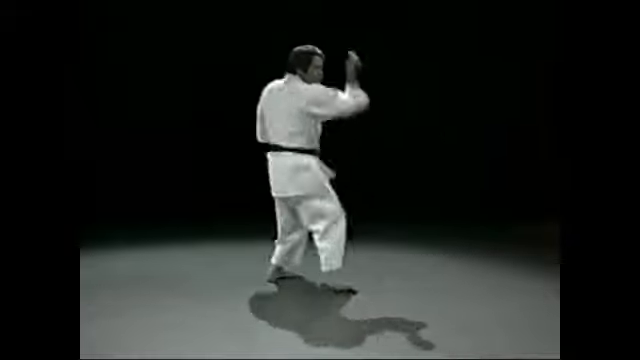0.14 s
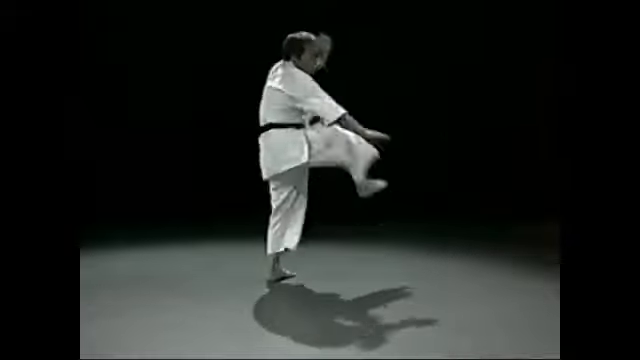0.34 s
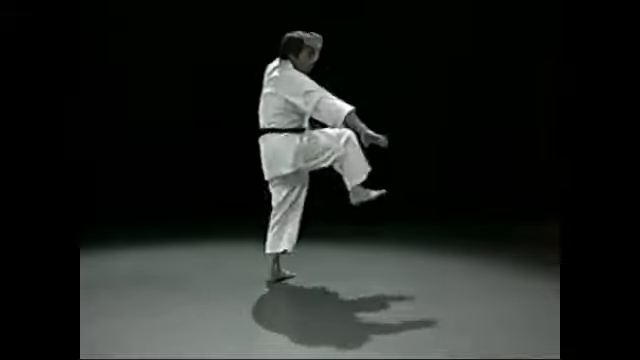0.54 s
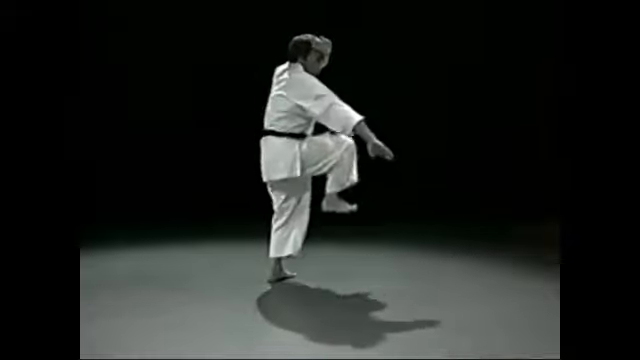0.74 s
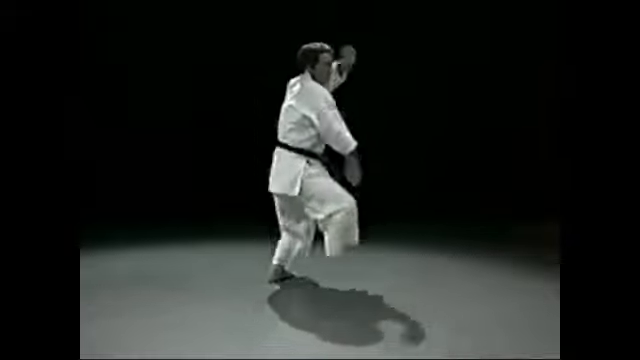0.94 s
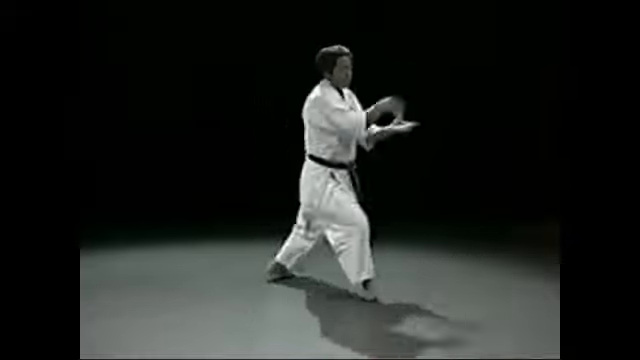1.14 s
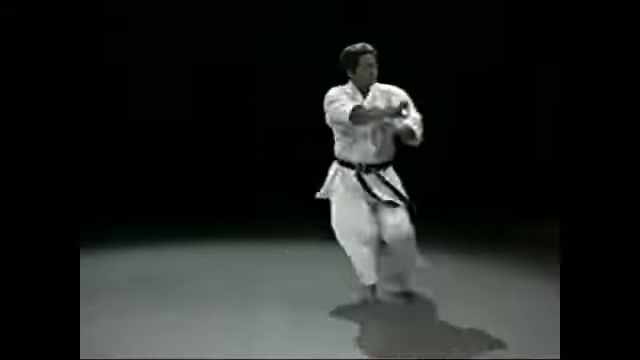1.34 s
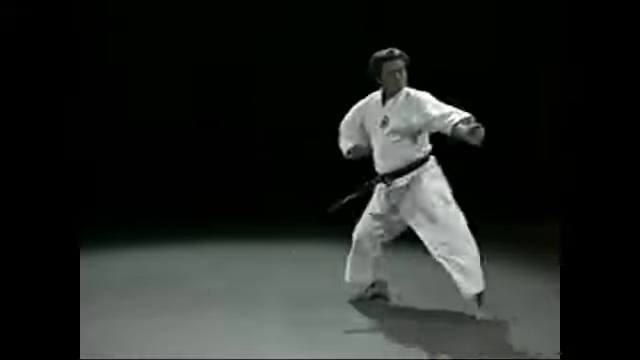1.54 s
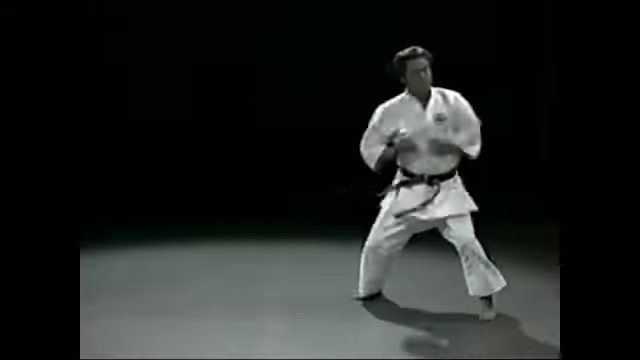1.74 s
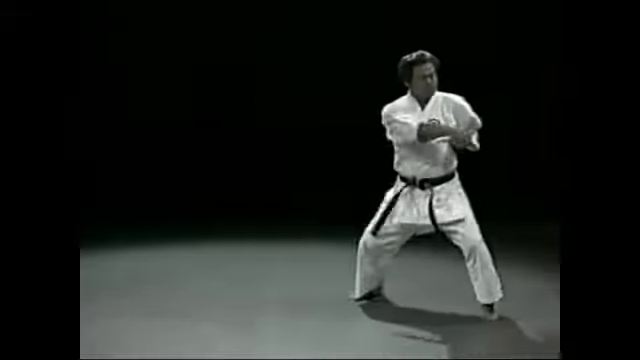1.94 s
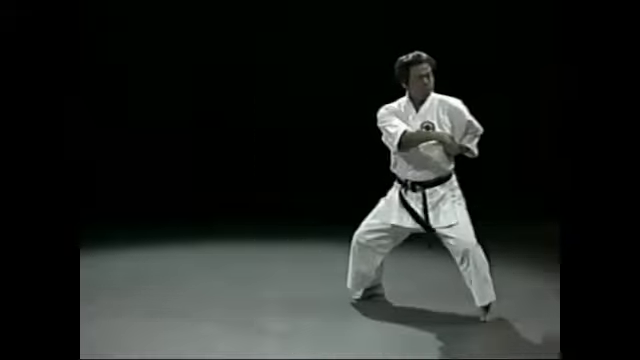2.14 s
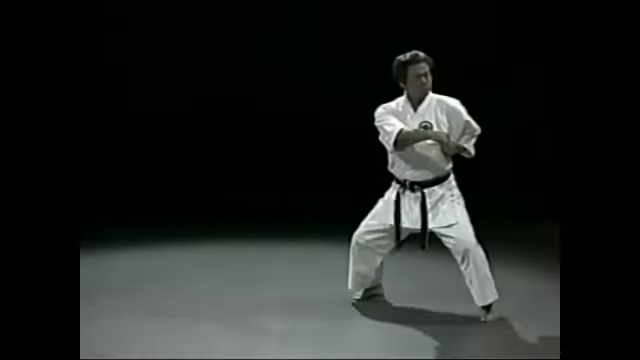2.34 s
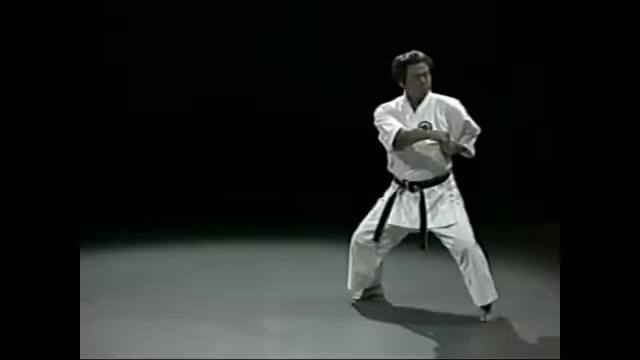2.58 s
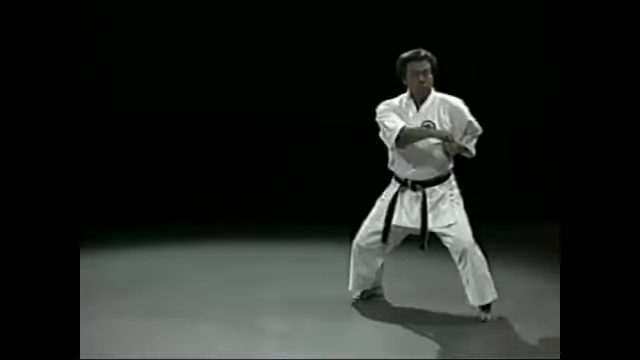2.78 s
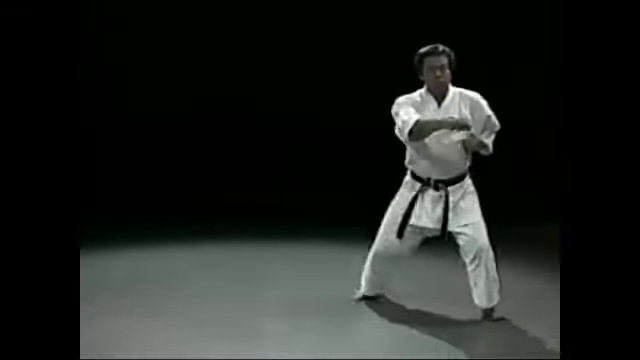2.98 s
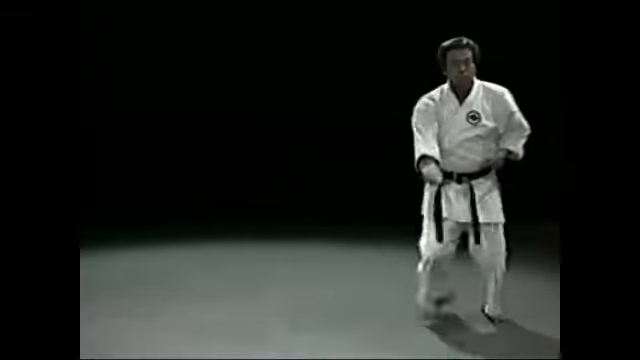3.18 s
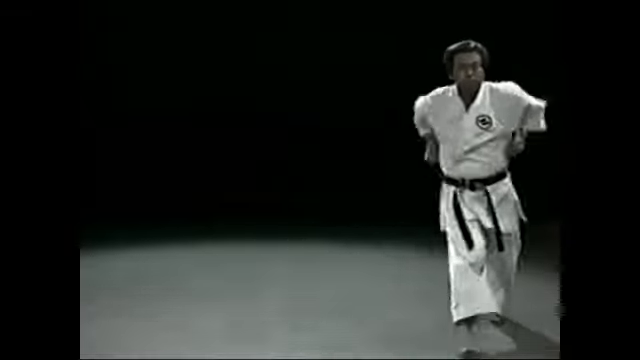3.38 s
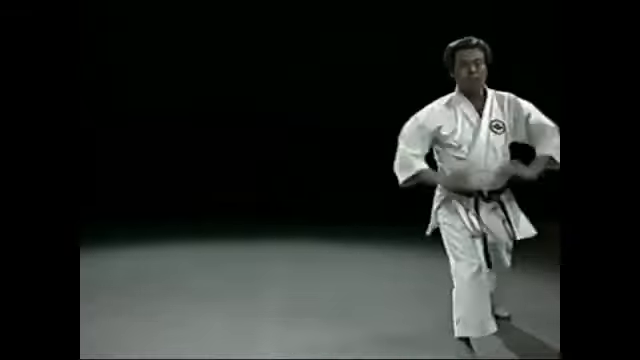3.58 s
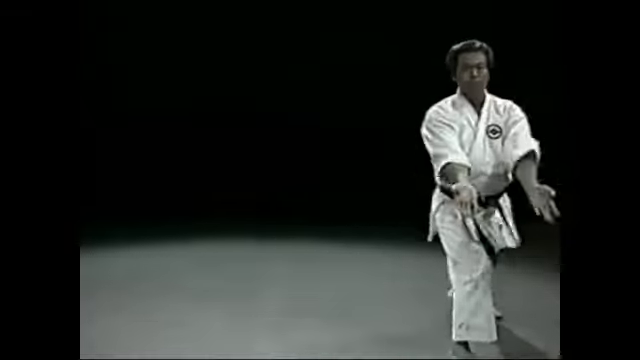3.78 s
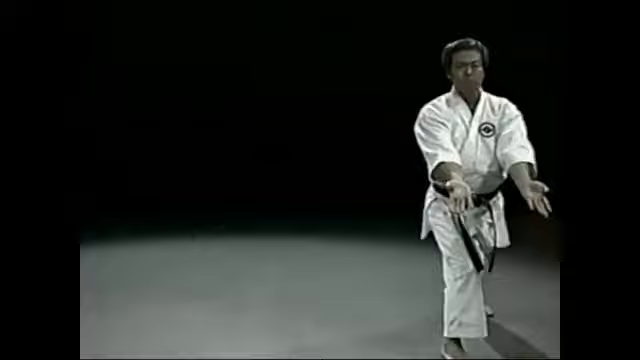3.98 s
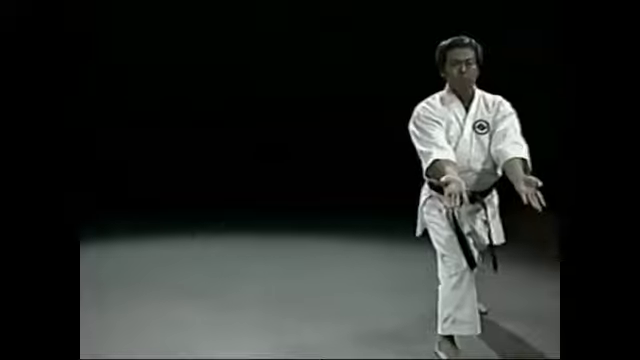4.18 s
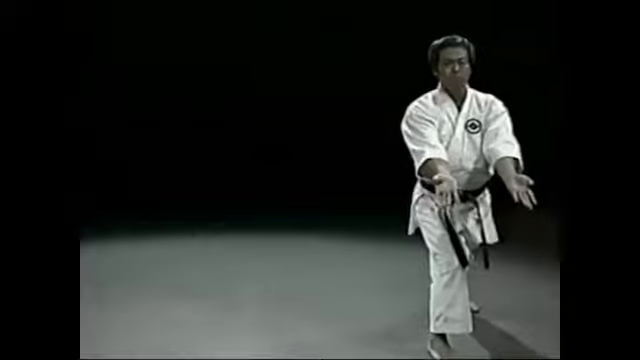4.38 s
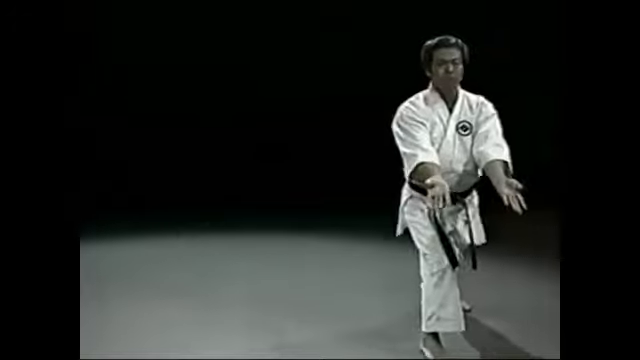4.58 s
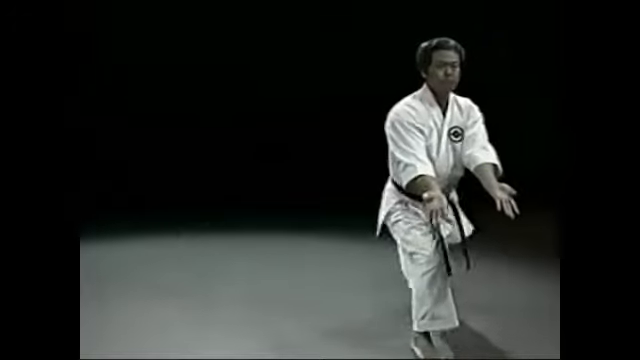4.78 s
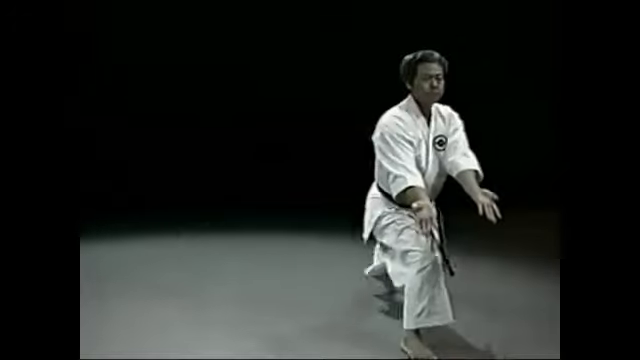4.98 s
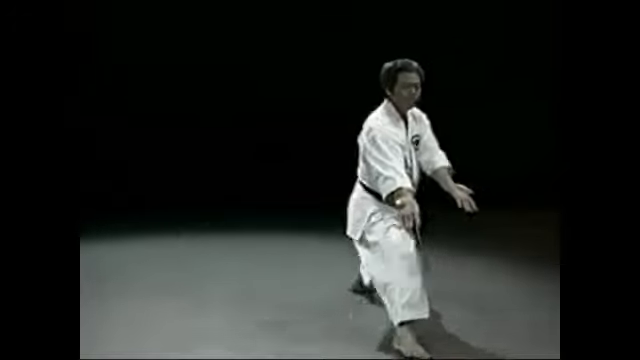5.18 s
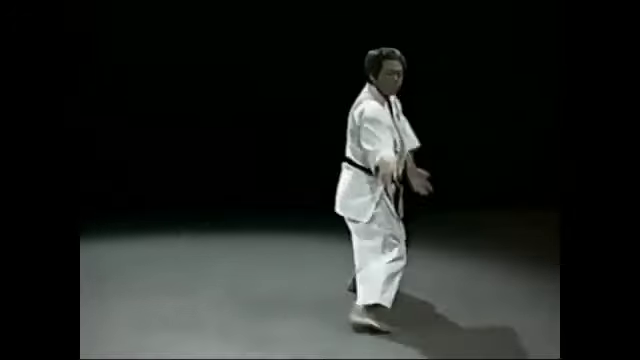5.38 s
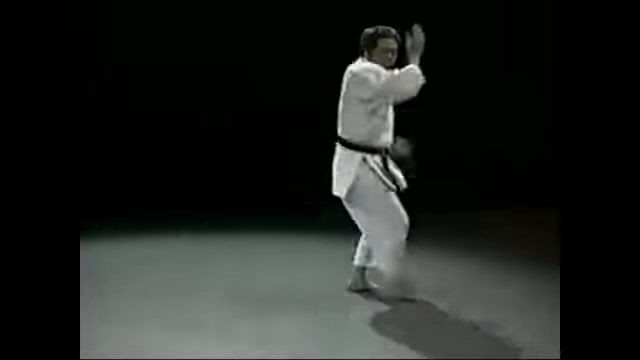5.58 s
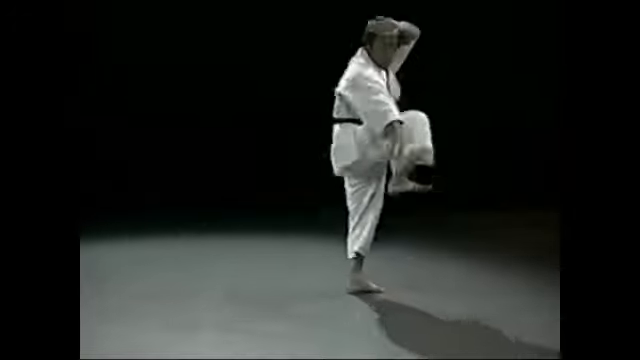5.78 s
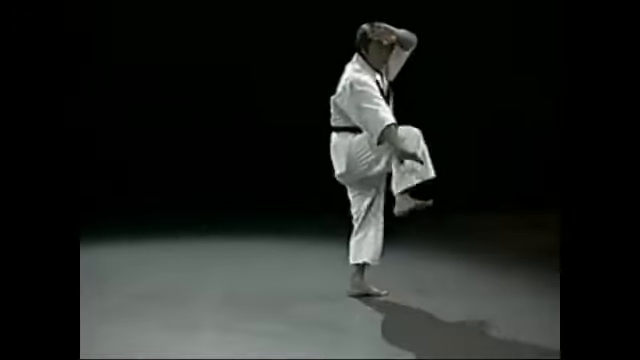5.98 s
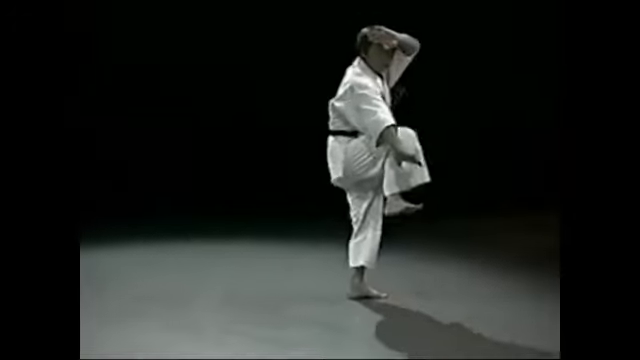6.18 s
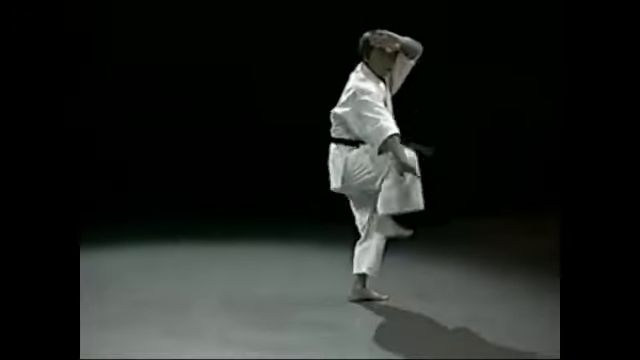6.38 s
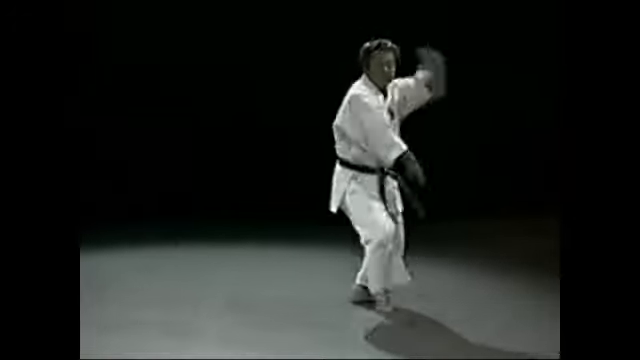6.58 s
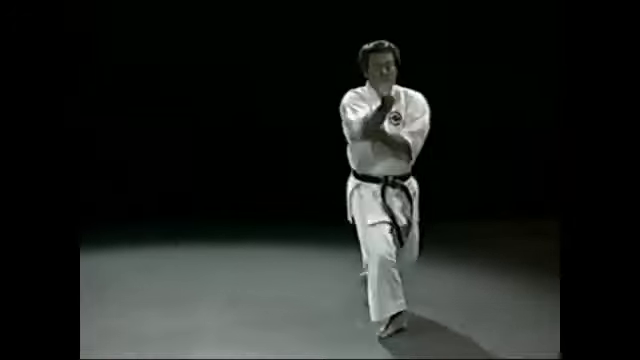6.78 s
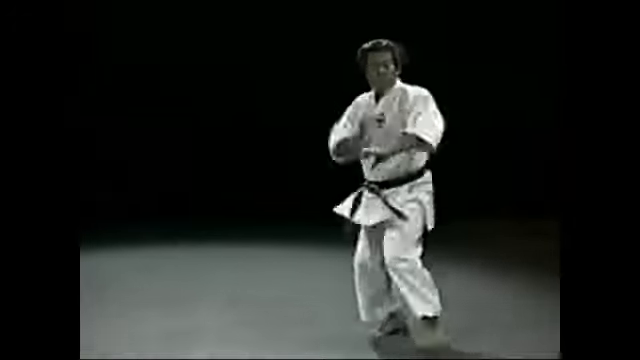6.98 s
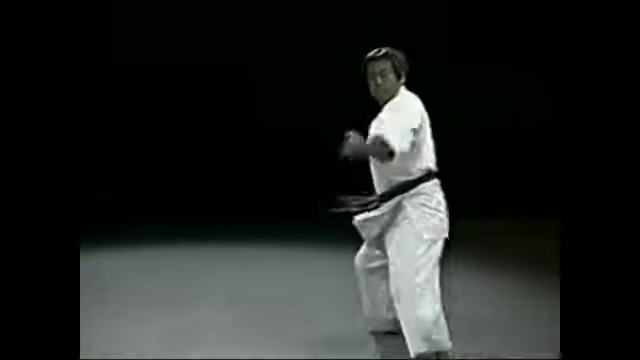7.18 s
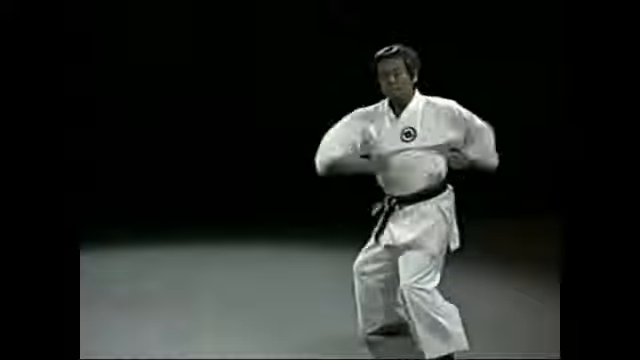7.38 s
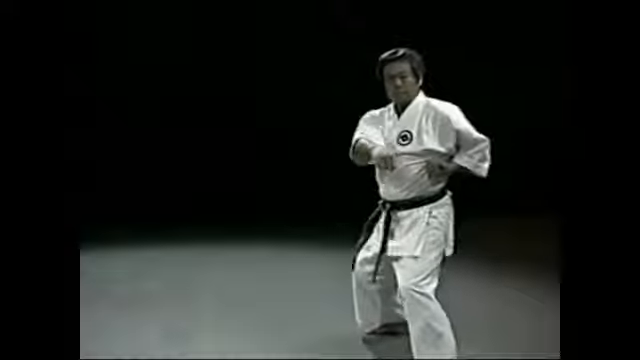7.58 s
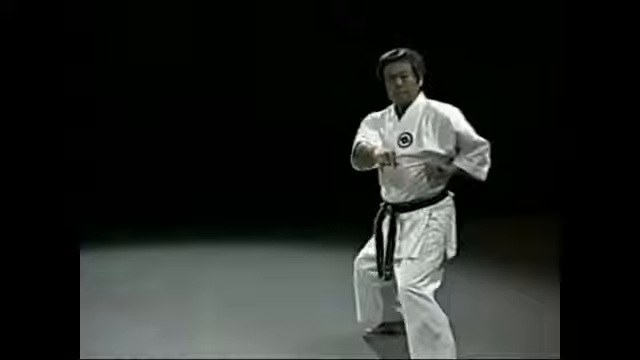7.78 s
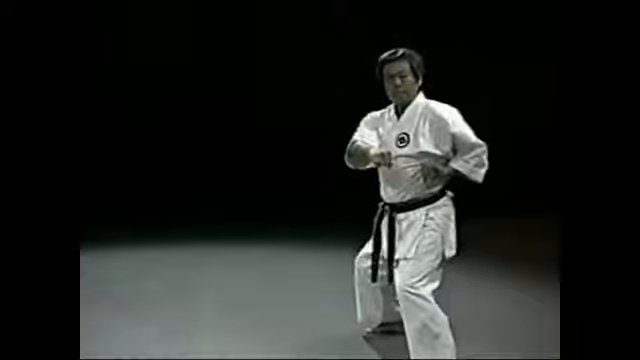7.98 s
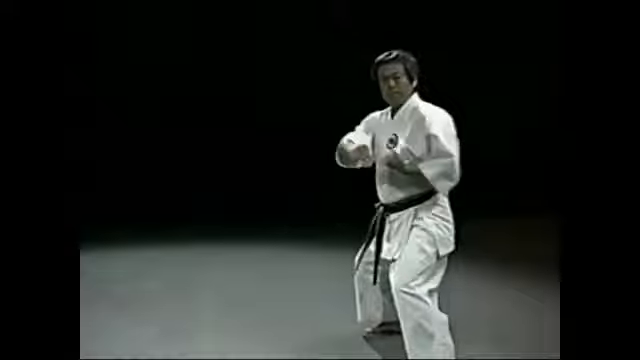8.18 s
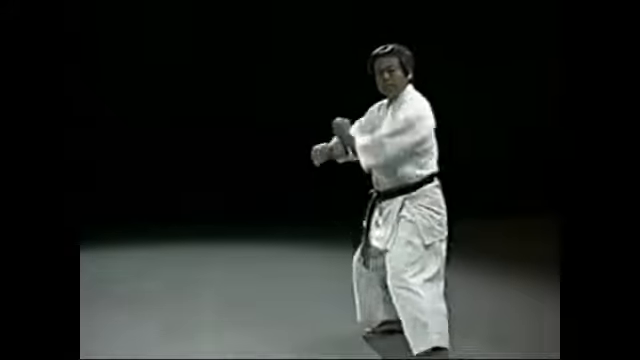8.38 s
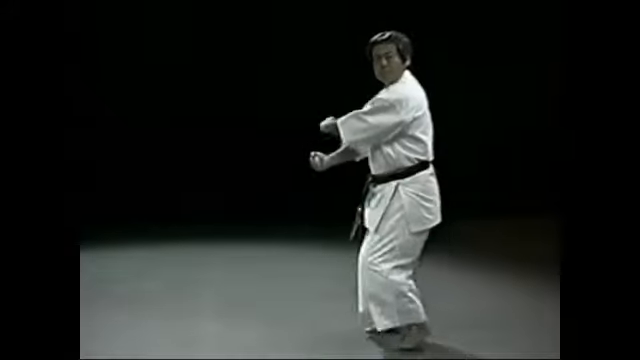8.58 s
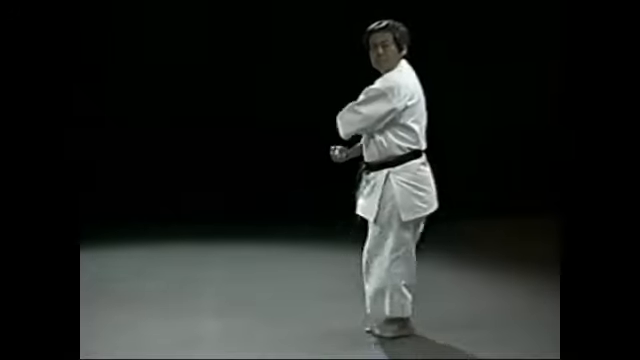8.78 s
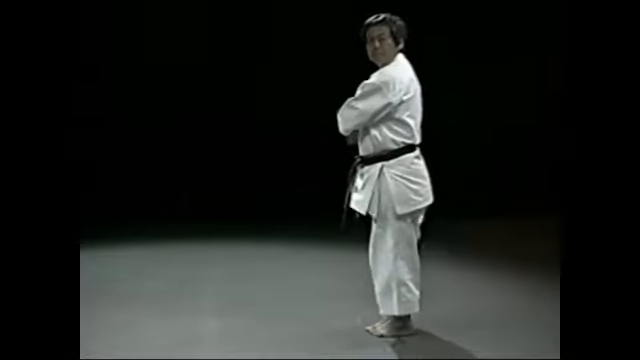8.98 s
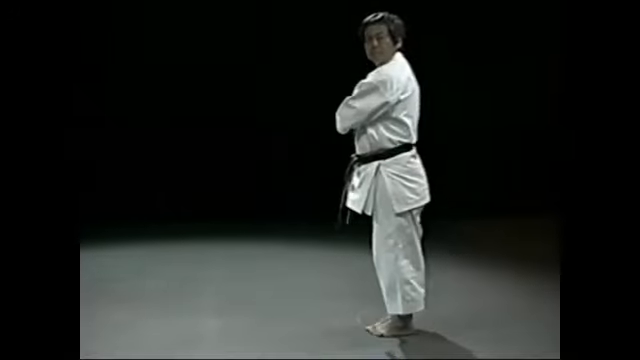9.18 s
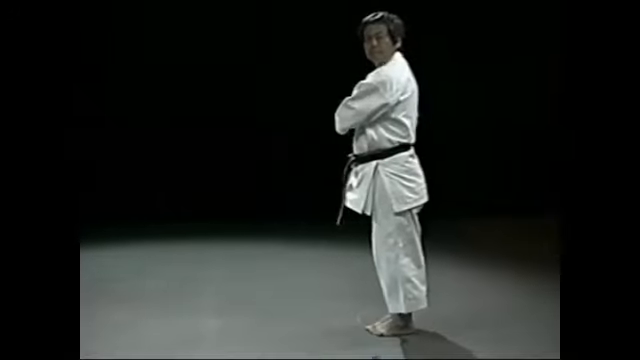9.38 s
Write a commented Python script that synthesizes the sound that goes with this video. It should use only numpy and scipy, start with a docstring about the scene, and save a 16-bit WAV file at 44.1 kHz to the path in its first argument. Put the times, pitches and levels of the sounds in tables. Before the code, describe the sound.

Over a constant worn-tape bed of hum, soft hiss, rumble and buzzing ticks, a kick snaps cotton cloth, then turns and punches bring rustles, cracks and dull floor thuds. After a quiet hold come a step, another pause, a sliding turn with a cluster of snaps, the loudest bright crack, and a last flurry of strikes. It ends in quiet rustling. Mono, with a short hall echo.

```python
"""Hum, hiss and rumble of an old tape chain run throughout, with ticks at the picture rate and a low drone
that comes and goes: steady sines, shaped noise and decaying spikes. Among them a karate kata in a heavy cotton
suit on a bare stage: sleeves and trouser legs rustle and flap (bunched friction noise that follows limb speed),
soles slide (bright noise) and cloth cracks taut (millisecond bursts), with low thumps (damped sines).
The hall answers cloth, slides and thumps with decaying scattered noise."""
import sys
import numpy as np
from scipy import signal
from scipy.fft import rfft, irfft
from scipy.io import wavfile
from scipy.ndimage import uniform_filter1d

SR = 44100
rng = np.random.default_rng(int(sys.argv[2]) if len(sys.argv) > 2 else 0)


def inscribe(sig):
    """Save sig as 16-bit PCM at rate SR to the path in sys.argv[1].

    A 1-D sig is mono; a 2-D sig holds one channel per row.
    Samples are clipped to [-1, 1] before scaling.
    """
    pcm = np.round(np.clip(np.atleast_2d(sig).T, -1, 1) * 32767)
    wavfile.write(sys.argv[1], SR, pcm.astype(np.int16))


N = 416304
TIME = np.arange(N) / SR

# Steady lines of the hum and of the picture's line scan, before wavering: f/Hz, rms level/dB
HUM_LINES = [(59.94, -77.5), (119.88, -60.5), (179.82, -67.5), (299.7, -73), (419.6, -80)]
WHINE_LINES = [(15734, -81)]
# Swell of the hum: t/s, gain/dB
HUM_SWELL_CURVE = [(1.3, -13), (2.2, 0.5), (3.4, 5.5), (4.5, 1.5), (6.3, -2), (7.6, -5.5), (9.4, 1)]
# Level of the low rumble, which the ticking follows: t/s, level/dB
RUMBLE_LEVEL = [(0, -48), (1.0, -54.5), (1.35, -46), (2.0, -46.5), (2.3, -53), (3.3, -43.5), (3.85, -46.5),
                (4.15, -58.5), (4.5, -47.5), (4.8, -58), (5.8, -49), (6.3, -60), (6.8, -50.5), (8.0, -52),
                (8.7, -50.5), (9.4, -51.5)]
# Relative spectra of the tape noises: f/Hz, density/dB per Hz
HISS_SPECTRUM = [(60, -3.5), (250, 18.5), (520, 20.5), (1000, 10), (2200, 8.5), (4000, 5.5), (9000, 5),
                 (16000, 3)]
RUMBLE_SPECTRUM = [(15, 5.5), (35, 9), (70, -3), (120, -6), (190, -9), (270, -28.5), (600, -40.5)]
# Ticks that take a set size: t/s, peak level/dB
SET_TICKS = [(.1949, -31.5), (.3281, -28.5), (.8956, -37.5), (1.7632, -25.5), (1.981, -27), (2.1794, -35),
             (2.6129, -35), (2.7631, -34), (2.8478, -28.5), (2.9642, -25.5), (3.215, -29.5), (3.365, -26.5),
             (3.7825, -32), (3.899, -32.5), (3.9325, -30), (3.966, -35), (4.033, -34.5), (4.35, -37),
             (4.483, -36.5), (5.2173, -33), (6.5683, -31.5), (7.1535, -43), (7.785, -36.5), (8.0873, -34),
             (8.655, -35.5), (9.2216, -33), (9.2554, -34.5)]
TICK_HZ, FIRST_TICK_S = 59.9315, 0.01126
USUAL_RUMBLE_DB, USUAL_TICK_DB = -51.5, -44.5
TICK_SLOPE = 0.9  # rise of the ticks in dB for each dB of rumble

# The drone's low tone and its octave: f/Hz, rms level/dB
DRONE_LINES = [(43.07, -48), (86.13, -50)]
# Times at which the drone sounds: start t/s, end t/s
DRONE_TIMES = [(0, .71), (1.17, 1.67), (1.74, 2.19), (3.17, 3.93), (4.83, 5.17), (5.42, 6.13), (6.68, 7.73),
               (8.23, 9.16)]

# Body movements (kicks, blocks, punches, steps, drawing up): t/s of greatest speed, build-up/s,
# level/dB and resonance f/Hz of flapping cloth, level/dB and resonance f/Hz of cloth rubbing on cloth
MOVEMENTS = [(.01, 0.18, -66, 550, -64.5, 2960), (.21, .052, -69, 500, -60, 3000),
             (.31, 0.045, -50, 560, -62, 2200), (0.386, .023, -37.5, 680, -47, 3400),
             (.46, 0.066, -41, 690, -53, 3300), (1.175, 0.056, -58.5, 940, -59, 1500),
             (1.328, 0.015, -44, 250, -36.5, 6000), (1.38, 0.049, -52.5, 446, -49.5, 5500),
             (1.617, .045, -47, 574, -52.5, 3520), (1.76, 0.087, -59.5, 547, -59.5, 3040),
             (1.885, 0.034, -44.5, 600, -50.5, 2400), (1.975, 0.054, -44, 530, -53.5, 2400),
             (3.22, 0.078, -61.5, 450, -71, 2000), (3.42, 0.091, -55.5, 620, -52, 3030),
             (3.6, 0.051, -76, 600, -61, 3500), (3.75, 0.094, -53, 990, -56, 3000),
             (4.815, 0.015, -69, 600, -62, 2600), (4.93, 0.15, -72, 595, -65.5, 2370),
             (5.49, 0.086, -62.5, 450, -56.5, 3540), (5.626, 0.082, -51, 583, -51.5, 3020),
             (5.795, .047, -39, 720, -48, 2000), (5.89, 0.06, -57.5, 650, -61.5, 1810),
             (6.66, 0.13, -70, 553, -69.5, 2480), (6.748, 0.019, -57, 566, -53.5, 2380),
             (6.884, 0.018, -58, 450, -40.5, 4200), (6.93, 0.055, -54, 560, -45, 4200),
             (7.135, 0.038, -50, 667, -51, 2434), (7.28, 0.21, -67, 600, -63, 3000),
             (7.44, .066, -45, 470, -61, 1500), (7.556, 0.047, -53, 520, -56.5, 3470),
             (8.33, .17, -87, 600, -61, 4500), (9.0, 0.13, -67.5, 534, -68, 2500)]
# Relative spectra of loose cloth flapping and of weave rubbing: f/Hz, density/dB per Hz
FLAP_SPECTRUM = [(120, -17), (270, -3.5), (430, -3.5), (680, -5), (900, -10.5), (1500, -12.5), (3500, -43)]
RUB_SPECTRUM = [(700, 0.5), (1400, 1), (2300, 3), (3400, 0), (5500, -2), (8500, -5), (11000, -19),
                (15000, -42)]
SETTLE_RATIO = 1.01  # slowing time over build-up time
SPEED_ROUNDNESS = 1.63  # 1 is a pointed peak of speed, 2 a bell
REST_FLAP_DB, REST_RUB_DB = -79, -79  # the suit stirs even in a held stance

# Relative response of the hall's scatter: f/Hz, density/dB per Hz
HALL_SPECTRUM = [(100, -27), (300, 2), (520, 0.5), (700, -3.5), (1100, 2), (2300, -5), (4400, 0), (7000, 0),
                 (10500, -2.5), (12500, -1.5), (15500, 5.5)]

# Soles sliding on the floor: start t/s, end t/s, level/dB, resonance f/Hz of the hiss
SOLE_SLIDES = [(0.223, 0.307, -58.5, 8170), (1.474, 1.69, -61.5, 7000), (3.146, 3.38, -60.5, 7500),
               (5.359, 5.459, -57.5, 8200), (5.416, 5.556, -53, 6170), (5.512, 5.672, -53, 5600),
               (7.05, 7.193, -58, 7000), (7.194, 7.6, -68.5, 8300), (8.49, 8.635, -59, 7760)]
# Relative spectrum of skin on the floor: f/Hz, density/dB per Hz
SOLE_SPECTRUM = [(1500, -17), (3300, 1), (6000, 2), (10500, -1), (12000, -7), (15500, -20)]

# Cloth cracking taut: t/s, level/dB, half the time from centre to 1/e of the swell/ms, centre f/Hz,
# relative spectral spread [scaled by width], puff of air against the crack before radiation/dB
CLOTH_SNAPS = [(0.3641, -34, 2, 560, .6, -4), (.371, -25.5, 0.96, 680, 0.39, -9),
               (.3794, -26, 1.06, 700, 0.47, -20), (0.3844, -29, 2.3, 720, 0.91, -20),
               (.393, -41, 3, 1700, 0.66, 3), (.435, -34.5, 3, 700, 0.8, -4),
               (1.1743, -43.5, 0.84, 1040, .6, -20), (1.3099, -26, 1.55, 5650, 2.1, -15),
               (1.577, -41.5, 1.7, 565, 0.19, -16), (1.8486, -30.5, 1.7, 1420, 1.13, -1),
               (1.858, -38.5, 2.4, 1830, .94, 1), (1.8619, -33, 1, 900, 1.3, -20),
               (1.944, -40.5, 6.2, 540, 0.46, -8), (1.991, -33.5, .55, 4870, 0.34, -30),
               (1.993, -27.5, 0.82, 2540, 0.26, -7), (1.9937, -32, 1, 1340, 0.3, -1),
               (2.001, -37, 1.4, 730, 1, -20), (3.5707, -34, 0.47, 4640, 1.7, -25),
               (3.698, -45.5, 2, 2230, 1.7, -4), (3.706, -44, 1.2, 2800, 1.3, 1),
               (3.712, -31.5, 1.46, 900, .85, -21), (5.202, -49.5, .89, 3440, 0.35, -35),
               (5.635, -42.5, 8.8, 5040, 0.59, -15), (5.74, -35.5, 2.2, 2060, 1.4, 8),
               (5.7499, -34, .9, 2470, .92, 6), (5.7639, -26, 1, 2830, 0.78, 1),
               (5.783, -35.5, 1.7, 2040, 0.66, 7), (5.7902, -25.5, 0.97, 745, .65, -17),
               (5.8036, -35, 1.6, 3050, 0.95, 8), (5.822, -37.5, 1.9, 1470, 1.1, -3),
               (6.3348, -52, 0.76, 2070, 0.22, -35), (6.752, -48, 2.8, 620, 0.92, -15),
               (6.8613, -21.5, 1.46, 3240, 1.35, -13), (6.864, -18, 1.05, 3460, 0.65, -6.5),
               (7.374, -43.5, 2.9, 695, 1.4, -18), (7.398, -40, 3, 1480, 1.1, -10),
               (7.406, -30.3, 1.4, 1670, .93, 0.5), (7.431, -46, 2.2, 5560, 0.56, 2),
               (7.462, -30, 1.95, 1300, 0.49, 9), (7.481, -32, 1.2, 550, 1.5, 7),
               (7.499, -41, 2.5, 520, 0.76, -2), (7.5199, -38.5, 1.4, 3160, 0.85, -30),
               (7.5435, -39.5, 2, 1780, 1.2, 5), (7.5577, -37.5, 2.1, 990, 1, -18)]

# Low thumps: t/s, level/dB, mid-glide f/Hz
THUMPS = [(0.472, -38, 109), (1.286, -34, 63.6), (1.306, -29.5, 131), (1.632, -31.5, 59.7),
          (1.756, -32.5, 102), (1.84, -30, 64.5), (1.986, -32.5, 70), (2.481, -32, 60.3),
          (3.353, -35.5, 186), (3.57, -45, 50), (3.65, -31.5, 55.3), (3.708, -30.5, 91), (4.54, -34, 90),
          (5.785, -38, 70), (6.859, -36.5, 125), (7.511, -37, 133)]

TOP_HZ = 15900  # upper band edge of the whole sound


def undb(db):
    """Logarithmic level: decibels to amplitude gain."""
    return 10 ** (np.asarray(db) / 20)


def unit(x):
    """Normalisation: scale to rms 1."""
    return x / np.sqrt(np.mean(x ** 2))


def colour(x, spectrum):
    """Linear filtering: weight x by a spectrum of (f/Hz, level/dB) points; rms 1."""
    hz, db = np.transpose(spectrum)
    f = np.fft.rfftfreq(len(x), 1 / SR) + 1
    gain = undb(np.interp(np.log(f), np.log(hz), db))
    return unit(irfft(rfft(x) * gain, len(x)))


def resonate(x, hz, boost_db, octaves):
    """Resonance: energy gathers in a band around hz; rms 1."""
    f = np.fft.rfftfreq(len(x), 1 / SR) + 1
    peak = np.exp(-(np.log2(f / hz) / octaves) ** 2)
    return unit(irfft(rfft(x) * undb(boost_db * peak), len(x)))


def walk(rate):
    """Random modulation: a smoothed wander of rms 1, with a new goal rate times a second."""
    hold = max(int(SR / rate), 1)
    steps = np.repeat(rng.standard_normal(N // hold + 1), hold)
    return unit(uniform_filter1d(steps, hold)[:N])


def add(track, s, sound):
    """Superposition: mix a sound into a track from time s."""
    i = max(int(s * SR), 0)
    track[i:i + len(sound)] += sound[:max(N - i, 0)]


def tones(lines):
    """Line spectrum: steady sines of random phase from (f/Hz, rms level/dB) rows."""
    total = np.zeros(N)
    for hz, db in lines:
        total += np.sqrt(2) * undb(db) * np.sin(2 * np.pi * (hz * TIME + rng.random()))
    return total


def ticks(tick_db, scatter_db=7.0, most_db=6, rise_s=0.00002, decay_s=0.00028,
          sag_db=-16, sag_s=0.0027, positive=0.75):
    """Impulse excitation: one voltage spike per picture field, each of its own size and sign."""
    at = (np.arange(FIRST_TICK_S, TIME[-1], 1 / TICK_HZ) * SR).astype(int)
    scatter = np.minimum(scatter_db * rng.standard_normal(len(at)), most_db)
    size = undb(tick_db[at] + scatter)
    for s, db in SET_TICKS:
        nearest = np.argmin(np.abs(TIME[at] - s))
        size[nearest] = undb(db)
    sign = np.where(rng.random(len(at)) < positive, 1, -1)
    spikes = np.zeros(N)
    spikes[at] = size * sign
    t = TIME[:SR // 64]
    # the spike drops fast, then the last of its charge leaks away slowly
    discharge = np.exp(-t / decay_s) + undb(sag_db) * np.exp(-t / sag_s)
    shape = (1 - np.exp(-t / rise_s)) * discharge
    return signal.fftconvolve(spikes, shape / shape.max())[:N]


def tape(hiss_db=-65.5, hum_waver_db=2.5, whine_waver_db=4, lump_db=3):
    """Additive noise: wavering hum and whine, smooth hiss, lumpy rumble whose level the ticks follow."""
    hum_db = np.interp(TIME, *np.transpose(HUM_SWELL_CURVE)) + hum_waver_db * walk(9)
    hum = tones(HUM_LINES) * undb(hum_db)
    whine = tones(WHINE_LINES) * undb(whine_waver_db * walk(60))
    hiss = colour(rng.standard_normal(N), HISS_SPECTRUM) * undb(hiss_db)
    rumble_db = np.interp(TIME, *np.transpose(RUMBLE_LEVEL))
    lumps = rng.standard_normal(N) * undb(lump_db * walk(22))
    rumble = colour(lumps, RUMBLE_SPECTRUM) * undb(rumble_db)
    tick_db = USUAL_TICK_DB + TICK_SLOPE * (rumble_db - USUAL_RUMBLE_DB)
    return hum + whine + hiss + rumble + ticks(tick_db)


def drone(fade_s=0.026):
    """Gated harmonics: a low tone and its octave that fade in and out together."""
    gate = np.zeros(N)
    for start, end in DRONE_TIMES:
        gate += np.clip(np.minimum(TIME - start, end - TIME) / fade_s, 0, 1)
    return gate * tones(DRONE_LINES)


def friction(spectrum, catch_hz, catch_db, fold_hz, fold_db):
    """Stick-slip friction: tiny slips as noise, bunched by fast catches and by slower passing folds."""
    bunching = undb(catch_db * walk(catch_hz) + fold_db * walk(fold_hz))
    return colour(rng.standard_normal(N) * bunching, spectrum)


def speed(t, build_s):
    """Kinematics: a limb gathers speed, peaks at 1 when t is 0 and slows again."""
    time_scale = build_s * np.where(t < 0, 1, SETTLE_RATIO)
    return np.exp(-np.abs(t / time_scale) ** SPEED_ROUNDNESS)


def suit():
    """Speed-driven friction: cloth flaps low and rubs higher up, each movement tuning both anew."""
    flap = friction(FLAP_SPECTRUM, catch_hz=198.9, catch_db=5.0, fold_hz=44.6, fold_db=0.0)
    rub = friction(RUB_SPECTRUM, catch_hz=595.6, catch_db=3.0, fold_hz=59.7, fold_db=1.9)
    out = undb(REST_FLAP_DB) * flap + undb(REST_RUB_DB) * rub
    for peak_s, build_s, flap_db, flap_hz, rub_db, rub_hz in MOVEMENTS:
        near = np.abs(TIME - peak_s) < 5 * build_s
        flapping = undb(flap_db) * resonate(flap[near], flap_hz, boost_db=4.5, octaves=0.38)
        rubbing = undb(rub_db) * resonate(rub[near], rub_hz, boost_db=4.5, octaves=0.45)
        out[near] += speed(TIME[near] - peak_s, build_s) * (flapping + rubbing)
    return out


def hall(x, wet_db=-6, gap_s=0.0093, early_db=-5, low_t60=0.35, high_t60=0.38):
    """Reverberation: weak scatter from the floor, then the walls; the bass dies slightly sooner."""
    t = TIME[:SR]
    scatter = colour(rng.standard_normal(len(t)), HALL_SPECTRUM)
    low = signal.sosfilt(signal.butter(2, 2500, fs=SR, output="sos"), scatter)
    high = signal.sosfilt(signal.butter(2, 2500, "high", fs=SR, output="sos"), scatter)
    # each band falls 60 dB in its own t60
    low_tail = low * np.exp(-np.log(1000) * t / low_t60)
    high_tail = high * np.exp(-np.log(1000) * t / high_t60)
    tail = (low_tail - high_tail) * np.where(t < gap_s, undb(early_db), 1)
    tail = tail / np.sqrt(np.sum(tail ** 2))
    return undb(wet_db) * signal.fftconvolve(x, tail)[:N]


def slides(arch=0.39):
    """Sliding friction: a sole hisses as it skims the floor, fastest in the middle of its path."""
    out = np.zeros(N)
    skin = friction(SOLE_SPECTRUM, catch_hz=378, catch_db=1.5, fold_hz=45.26, fold_db=3.5)
    for start, end, db, hz in SOLE_SLIDES:
        during = (TIME > start) & (TIME < end)
        path = 2 * (TIME[during] - start) / (end - start) - 1  # -1 at the start, 1 at the end
        pace = 1 - path ** 2
        hissing = resonate(skin[during], hz, boost_db=6, octaves=0.54)
        out[during] += undb(db) * pace ** arch * hissing
    return out


def burst(magnitude, swell, count, evenness=0.48):
    """Transient synthesis: a shiver gathered under the swell; each round restores its spectrum."""
    x = irfft(magnitude * np.exp(2j * np.pi * rng.random(len(magnitude))))
    for _ in range(count):
        phase = np.angle(rfft(x * swell))
        x = irfft(magnitude * np.exp(1j * phase))
    envelope = np.abs(signal.hilbert(x)) + 1e-12
    x = swell * x / envelope ** evenness  # tension limits the swing
    return x * np.sqrt(np.sum(swell ** 2) / np.sum(x ** 2))


def snaps(skirt=1.85, width=1.69, puff_hz=520, puff_octaves=0.4, weave_hz=11300, panel_hz=330,
          squareness=2.5, sleeve_hz=1220, sleeve_db=2.5, sleeve_around_db=2):
    """Impulsive radiation: a fold whips taut in milliseconds; returns the sound ahead and all around."""
    ahead, around = np.zeros(N), np.zeros(N)
    t = (np.arange(2048) - 1024) / SR
    f = np.fft.rfftfreq(len(t), 1 / SR) + 1
    puff = np.exp(-(np.log2(f / puff_hz) / puff_octaves) ** 2)  # air pushed out of the sleeve
    # the soft weave gives little top, and a small panel radiates little bass
    radiation = 1 / np.sqrt(f * (1 + (f / weave_hz) ** 10) * (1 + (panel_hz / f) ** 6))
    for s, db, half_ms, hz, spread, puff_db in CLOTH_SNAPS:
        crack = (1 + (np.log2(f / hz) / (width * spread)) ** 2) ** -skirt
        spectrum = (crack + undb(puff_db) * puff) * radiation
        sleeve = np.cos(2 * np.pi * (f - hz) / sleeve_hz)  # evenly spaced air resonances across the sleeve
        swell = np.exp(-np.abs(t / (2 * half_ms / 1000)) ** squareness)
        snap = undb(db) * burst(spectrum * undb(sleeve_db * sleeve), swell, count=1)
        add(ahead, s + t[0], snap)
        # seen from one side a snap has a ragged spectrum; summed over all sides it is smoother
        smooth = np.fft.fftshift(irfft(spectrum * undb(sleeve_around_db * sleeve)))
        add(around, s + t[0], np.std(snap) * unit(smooth))
    return ahead, around


def thumps(rise_s=0.0022, cycles=0.77, sag=0.12, knock_db=-13, knock_hz=175, knock_s=0.0097):
    """Damped oscillation: a low thump swings and sinks in pitch, with a weaker, brief knock."""
    out, t = np.zeros(N), TIME[:SR // 5]
    for s, db, hz in THUMPS:
        fade = np.exp(-t * hz / cycles)
        phase = 2 * np.pi * hz * np.cumsum(1 + sag * (fade - 0.5)) / SR
        push = 1 - np.exp(-t / rise_s)
        knock = undb(knock_db) * np.sin(2 * np.pi * knock_hz * t) * np.exp(-t / knock_s)
        thump = push * (np.sin(phase) * fade + knock)
        add(out, s, undb(db) * thump / np.max(push * fade))
    return out


def scene():
    """Superposition: cloth, slides and thumps with the hall's answer, over the tape chain and the drone."""
    noise = tape() + drone()
    steady_aim = suit() + slides() + thumps()  # sent alike ahead and into the hall
    ahead, around = snaps()
    stage = steady_aim + ahead + hall(steady_aim + around)
    return (noise + stage)[None]


def record(dry):
    """Band limitation: the top is cut, and the whole signal rides on a constant offset."""
    offset = 0.3496  # of full scale
    top_cut = signal.ellip(10, 0.1, 70, TOP_HZ, fs=SR, output="sos")
    return signal.sosfilt(top_cut, dry) + offset


dry = scene()
out = record(dry)
inscribe(out)
```